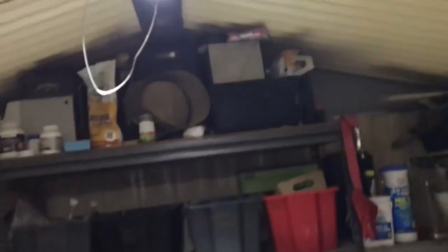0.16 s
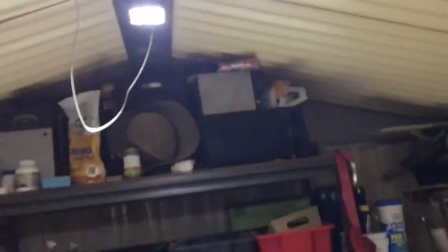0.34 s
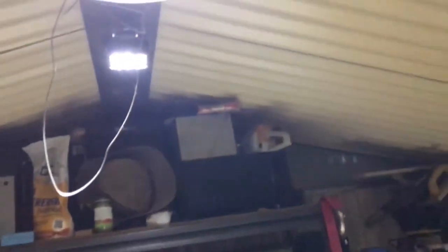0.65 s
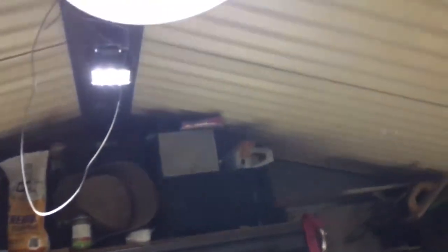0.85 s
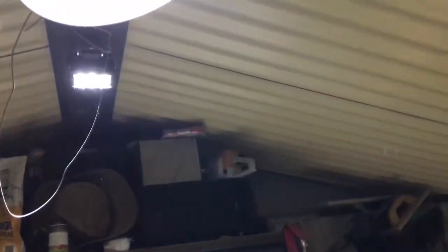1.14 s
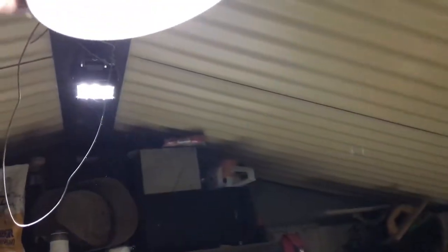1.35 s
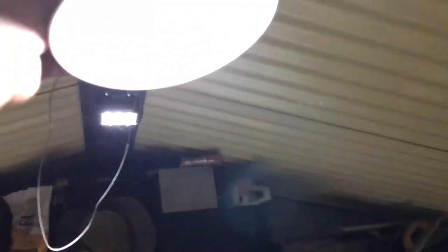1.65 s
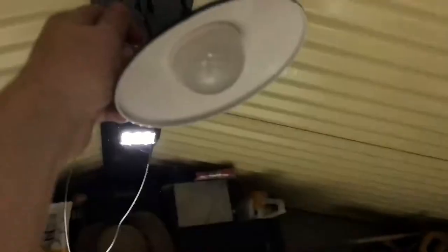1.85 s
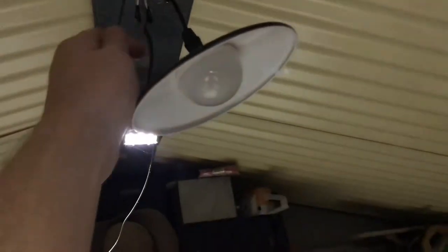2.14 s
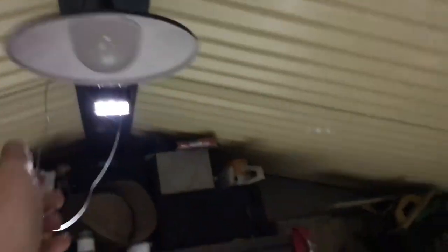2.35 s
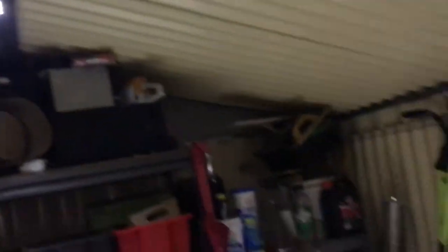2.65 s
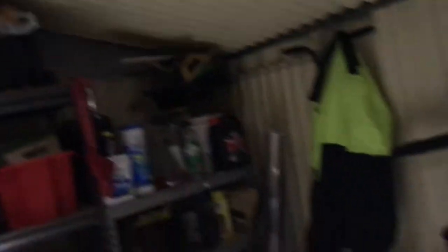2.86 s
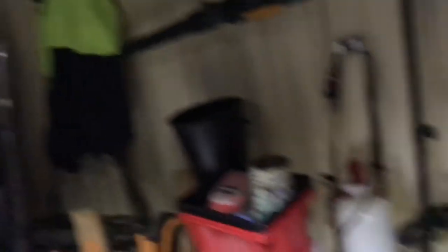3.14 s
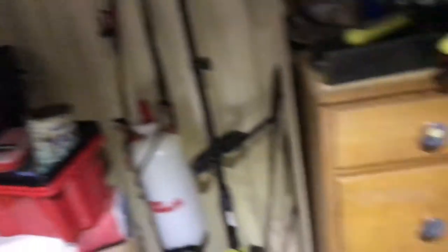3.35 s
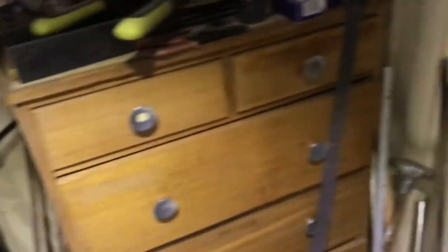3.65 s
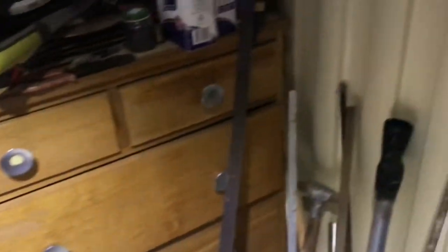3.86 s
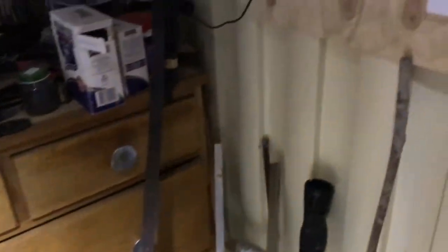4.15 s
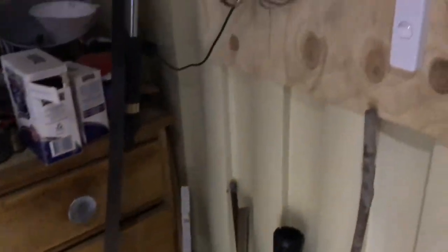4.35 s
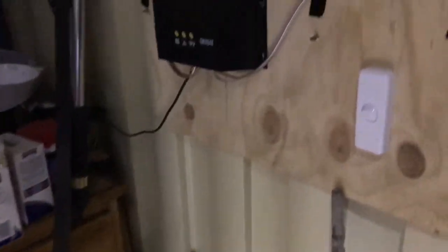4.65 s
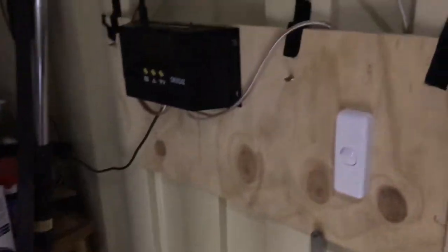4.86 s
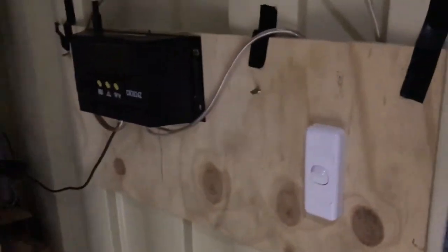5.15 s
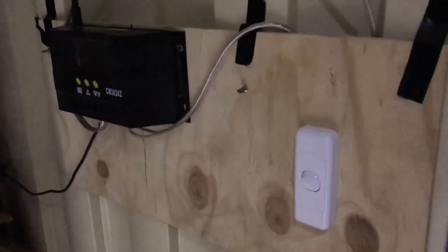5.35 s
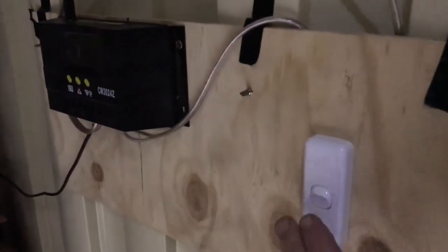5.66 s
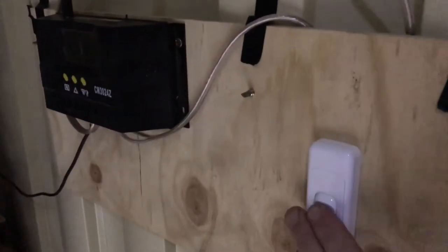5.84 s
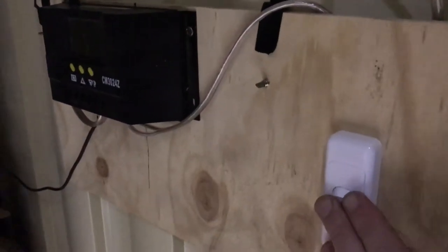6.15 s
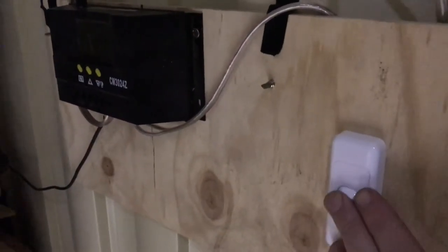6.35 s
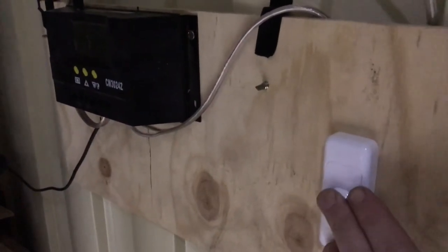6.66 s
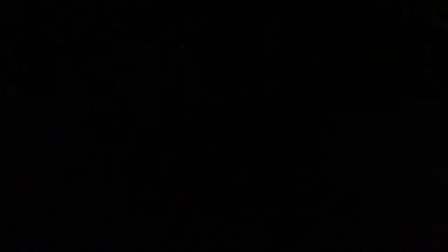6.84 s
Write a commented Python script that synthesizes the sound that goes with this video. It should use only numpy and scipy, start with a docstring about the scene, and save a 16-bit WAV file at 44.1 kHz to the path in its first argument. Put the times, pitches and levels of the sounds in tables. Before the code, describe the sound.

A quiet tin shed, heard from a handheld microphone, with faint low rumble and smooth hiss. Soft sleeve brushes come first, then small scuffs and a scrape around 0.8 s. Bright loose metal clinks at 0.96, 1.08 and 1.39 s, the last lingering faintly. Dull rubbing murmurs through the roof from 1.1 s, growing until 2.4. At 1.85 s a tiny, crisp click turns the lamp off; at 2.2 a short hard knock sets the roof sheets drumming softly. A clear metal clink rings at 2.8. From 3.3 to 5 s, shoes scuff, grit snaps, a soft heel thud lands near 3.5, with faint metal tinkles. A wavering hum near 90 Hz rises by 5 s, with faint shuffling after. Near stillness follows, then at 6.93 s a plastic rocker slams over: a loud, dry, very close double-edged snap with a brief woody knock.

```python
"""A plastic rocker switch on a plywood board snaps over, very close, after a walk through a tin shed.
Before it, loose metal clinks and scrapes, and a hanging lamp is clicked off and knocked, so the roof drums.
Shoes and sleeves scuff on the way to the wall, where a faint hum grows over still air.
Blows are damped modes plus coloured noise bursts; rubs are noise of jumping strength; a reverb adds the shed."""
import sys
import numpy as np
from scipy import signal
from scipy.fft import rfft, irfft
from scipy.io import wavfile
from scipy.ndimage import uniform_filter1d

SR = 44100
rng = np.random.default_rng(int(sys.argv[2]) if len(sys.argv) > 2 else 0)


def int16_out(signal):
    """Quantize to a 16-bit WAV file."""
    q = np.round(np.clip(np.atleast_2d(signal).T, -1, 1) * 32767)
    wavfile.write(sys.argv[1], SR, q.astype(np.int16))


N = 308700  # 7 s
TIME = np.arange(N) / SR
AGE = TIME[:SR]  # seconds since a blow

# Levels of single sounds are dry, before the shed's reverb.
# rocker creaks, tips over, slams home and rebounds: start_s [s], level_db [dB], cutoff_hz [Hz]
ROCKER_CONTACTS = [(6.9062, -65, 7000), (6.918, -62, 12000), (6.9284, -19, 15900), (6.9295, -16.5, 13200),
                   (6.9318, -24.5, 5000), (6.9353, -27.5, 6000)]
# modes of the switch plate: pitch_hz [Hz], level_db [dB], t60_s [s]
PLATE_MODES = [(1370, 7, 0.027), (1505, 6, 0.03), (1630, -1.5, 0.03), (1750, -4.5, 0.033), (2270, -6, .04),
               (2270, -8, 0.057), (2490, -14, 0.086), (3430, -11, 0.043), (3676, -6, 0.051),
               (3800, -1, 0.037), (4710, 1.5, 0.02), (5150, 1, 0.03), (5780, -10, 0.022), (6740, -4, 0.027),
               (9500, -10, .02)]
# modes of the plywood board and the wall behind: pitch_hz [Hz], level_db [dB], t60_s [s]
BOARD_MODES = [(113, -24, 0.36), (296, -24, 0.1), (403, -11, 0.032), (502, -5, 0.05), (618, 3.5, 0.052),
               (665, 2, 0.053)]
# colour of a plastic contact's crack: freq_hz [Hz], level_db [dB]
PLASTIC_COLOUR = [(100, -16), (220, -26), (450, -10), (680, 2.5), (930, -9), (1150, -17.5), (1450, 4.5),
                  (2900, -1.5), (4300, -4.5), (6800, -4.5), (8300, -8.5), (9700, -2.5), (12500, -7),
                  (16000, -3)]
# loose metal is struck: start_s [s], level_db [dB], cutoff_hz [Hz], favoured_hz [Hz], boost_db [dB],
# free_share [0-1, share of the swing that rings freely]
METAL_BLOWS = [(0.824, -45, 4900, 1820, 29, 0.5), (0.9633, -20.5, 9400, 1820, 6.5, 0),
               (1.0819, -22.5, 6300, 3750, 1.5, 0.06), (1.0871, -27, 2900, 1574, 17.5, 0),
               (1.294, -47, 2400, 1600, 8.5, 0.1), (1.3853, -27, 8900, 3940, 7, 0.08),
               (2.8013, -21.5, 3640, 3283, 17.5, 0.3), (3.515, -42, 4460, 3360, 22, 0.7),
               (4.219, -42.5, 4300, 1335, 11, .5), (4.837, -55, 2250, 1338, 11, 0.76)]
# metal slides on metal; the row at 1.399 s is the faint bright ring lingering after a clink:
# start_s [s], level_db [dB], length_s [s], cutoff_hz [Hz]
SLIDES_AND_LINGER = [(0.778, -57.5, 0.12, 1970), (1.236, -51.5, .15, 1980), (1.399, -64, 0.42, 8140),
                     (2.93, -62, 0.22, 1820), (3.48, -49, 0.16, 1960), (4.097, -65.5, 0.29, 1760)]
# modes of the loose metal: pitch_hz [Hz], level_db [dB], t60_s [s]
METAL_MODES = [(1059, -16.5, 0.23), (1326, -14.5, .42), (1483, -7, 0.11), (1480, -17.5, 0.096),
               (1587, -8, 0.29), (1809, -4, 0.21), (2020, -18.5, 0.85), (2280, -6.5, 0.045),
               (3217, -8.5, 0.21), (3370, -4.5, 0.13), (3476, -12.5, .24), (3660, 1.5, 0.082),
               (4011, -3, 0.35), (4290, -22, 0.4), (4700, -13.5, 0.154), (4950, 0.5, .19),
               (5600, -0.5, 0.2), (5605, -10, 0.084), (6236, -1.5, 0.46), (6540, -5, 0.28),
               (6650, -1.5, 0.15), (8180, -2, .13), (8660, -9, 0.099), (8900, -9.5, 0.19),
               (10820, -14, 0.1)]
# colour of a metal contact's crack: freq_hz [Hz], level_db [dB]
METAL_COLOUR = [(100, -36), (450, -18.5), (750, -15), (1050, -5), (1550, -3.5), (2600, -2.5), (5000, -0.5),
                (5800, -5), (6500, -0.5), (8500, -13.5), (12000, -3), (16000, -13.5)]
# small ticks and the lamp's click: start_s [s], level_db [dB], cutoff_hz [Hz]
LAMP_CONTACTS = [(1.781, -58, 3500), (1.8362, -47.5, 3460), (1.8507, -20.5, 19000)]
# colour of the lamp's click: freq_hz [Hz], level_db [dB]
CLICK_COLOUR = [(100, -24.5), (1200, -18.5), (2000, -15), (3400, -26), (5000, -11.5), (6000, -16),
                (7100, -12), (8200, -16), (10000, -5), (11000, 4), (12200, 0.5), (13500, -9.5),
                (16000, -17)]
# knocks on the lamp's fitting: start_s [s], level_db [dB], cutoff_hz [Hz]
FITTING_KNOCKS = [(2.197, -37, 2530), (2.2088, -21.5, 17000), (2.215, -30.5, 8000)]
# colour of those knocks: freq_hz [Hz], level_db [dB]
KNOCK_COLOUR = [(100, -35.5), (600, 0), (1400, -6.5), (1850, -26), (2300, -4), (3800, -6), (5000, -0.5),
                (6300, -4.5), (8800, -5), (10000, -14), (11000, -7.5), (16000, -15)]
# modes of the lamp's fitting: pitch_hz [Hz], level_db [dB], t60_s [s]
FITTING_MODES = [(1854, 13, 0.044), (1843, -20.5, .06), (2070, -8.5, 0.094), (2360, -15, 0.188),
                 (2650, -15, .18), (4670, 1, 0.035), (5100, -2, 0.0383), (5530, -12, .1)]
# jolts to the roof: start_s [s], modes_db [dB], wash_db [dB], cutoff_hz [Hz]
ROOF_JOLTS = [(1.618, -43.5, -46, 1580), (1.851, -40, -36, 900), (2.124, -39.5, -43, 590),
              (2.2094, -29, -32, 2500)]
# strong modes of the roof sheets: pitch_hz [Hz], level_db [dB], t60_s [s]
ROOF_MODES = [(71.6, -19, 0.438), (116.4, -5.5, 0.2), (207, -11.5, 1), (251.8, -8, 0.41), (311.6, 2.5, 0.3),
              (323, -8.5, .5), (374, 1, 0.29), (551, 1.5, 0.25), (653.3, 1, 0.25)]
# the sheets' many weaker modes as one wash: freq_hz [Hz], level_db [dB]
WASH_COLOUR = [(50, -9.5), (120, 3), (300, -6), (700, -4.5), (1300, -3.5), (2600, -5.5), (6000, -32)]
# a sole scuffs the floor: start_s [s], level_db [dB before the walking trim], length_s [s],
# tilt_db [dB per octave]
SOLE_SCUFFS = [(0.921, -42.5, 0.014, -0.5), (0.95, -37, 0.036, -1.5), (3.2844, -48.5, 0.027, 0.5),
               (3.334, -39.5, 0.022, 0.5), (3.499, -48.5, 0.22, -5), (3.552, -40.5, .07, 4.5),
               (4.05, -46, .024, 3), (4.52, -44.5, 0.026, -3), (4.946, -52, 0.011, -1.5)]
# a sleeve brushes past: start_s [s], level_db [dB before the walking trim], length_s [s],
# tilt_db [dB per octave]
SLEEVE_SWISHES = [(0.291, -52, 0.061, -1.5), (0.418, -55.5, 0.037, 0), (0.662, -52.5, 0.17, 3.5),
                  (1.013, -49, .03, 7), (1.21, -54, 0.22, 3.5), (1.6, -59.5, .16, 1.5),
                  (2.003, -60.5, 0.35, 2), (2.62, -45, 0.048, -1.5), (2.981, -48, 0.055, -0.5),
                  (4.861, -57, .08, 3), (5.819, -64.5, 0.28, -1)]
# grit snaps underfoot: start_s [s], level_db [dB before the walking trim]
GRIT_SNAPS = [(0.6894, -52), (3.287, -50), (3.353, -41), (4.5462, -39.5), (4.949, -53.5), (5.2794, -58),
              (5.497, -58), (5.83, -58.5), (6.378, -66)]
# a heel comes down: start_s [s], level_db [dB before the walking trim], decay_s [s, burst setting]
HEEL_THUDS = [(3.471, -42, 0.083), (3.501, -40.5, 0.068), (3.527, -41.5, 0.12)]
# colour of scuffs, swishes and grit: freq_hz [Hz], level_db [dB]
RUB_COLOUR = [(100, -22.5), (400, -16.5), (750, -14.5), (1150, -1.5), (1700, -0.5), (2500, -0.5),
              (3700, -0.5), (5500, -6), (8000, -8.5), (10300, -10), (12000, -10), (16000, -17)]
# colour of the heel's thud: freq_hz [Hz], level_db [dB]
THUD_COLOUR = [(40, -33), (110, -7), (190, 1), (300, 4.5), (450, -8), (650, -2.5), (1000, -18), (1600, -11),
               (3000, -32), (10000, -31)]
# colour of the still air: freq_hz [Hz], level_db [dB, relative]
AIR_COLOUR = [(18, -30), (30, -0.5), (55, -0.5), (189, -7), (415, -13), (499, -18), (632, -18.5),
              (2120, -25.5), (4300, -27.5), (4780, -28), (10500, -34.5), (14800, -32.5), (16000, -41)]
# the shed's reverberation: freq_hz [Hz], t60_s [s]
SHED_DECAY = [(100, 0.94), (300, 0.52), (700, 0.33), (1800, 0.23), (5000, 0.26), (12000, 0.1)]

# the more a blow favours one mode, the less it cracks
CLINK_CRACK_DB, CRACK_LOSS_PER_BOOST_DB = 1.5, 0.49
TOUCH_T60_S = 0.0896  # decay of the choked share of a clink
# a hand takes hold of the lamp, rubs ever harder and lets go
GRIP_S, LET_GO_S = 1.14, 2.42
RUB_DB, RUB_GROWTH_DB_PER_S, RUB_ONSET_DB_PER_S, RUB_RELEASE_DB_PER_S = -60.5, 7.5, 90, 73
# a sole bites at once, and a longer slide takes longer to stop
SOLE_RISE_S, SOLE_T60_S, SOLE_T60_PER_LENGTH, SOLE_T60_MAX_S = 0.002, 0.031, 8.1, 0.66
# cloth swells and dies away softly
CLOTH_RISE_S, CLOTH_T60_S = 0.044, 0.25
# faint shuffling at the wall; its level and the other walking levels share one trim
SHUFFLE_FROM_S, SHUFFLE_TO_S, SHUFFLE_LENGTH_S = 5.25, 5.45, 0.042
SHUFFLE_UNTRIMMED_DB, SHUFFLE_TILT_DB_PER_OCTAVE, WALKING_TRIM_DB = -64.5, -2, -2.0
# the hum and whirr grow during the approach to the wall
APPROACH_FROM_S, APPROACH_TO_S, HUM_FAR_DB, HUM_NEAR_DB = 3.7, 5.0, -76.5, -62.5
AIR_DB = -63.5  # rms above 200 Hz, around which it wanders


def wall_switch(plate_db=-18, board_db=-29.5, slam_s=6.9288):
    """The spring throws the rocker over; each contact cracks, and the slam rings the plate and its board."""
    out = np.zeros(N)
    for start_s, level_db, cutoff_hz in ROCKER_CONTACTS:
        snap = soften(crack(PLASTIC_COLOUR, decay_s=0.0109), cutoff_hz)
        add(out, start_s, blow(snap, level_db))
    slam = amp(plate_db) * ring(PLATE_MODES) + amp(board_db) * ring(BOARD_MODES)
    add(out, slam_s, slam)
    return shed(out, wet_db=-8.0, gap_s=0.0035)


def clinks():
    """Loose metal is struck and slides; the place of each blow favours some of its modes."""
    return shed(metal_blows() + slides_and_linger(), wet_db=-8)


def metal_blows(accent_octaves=0.071, crack_decay_s=0.054, scatter_db=2.5):
    """Each blow rings the metal and cracks; touching pieces choke part of the ring."""
    out = np.zeros(N)
    pitch_hz, mode_db, t60_s = np.transpose(METAL_MODES)
    for start_s, level_db, cutoff_hz, favoured_hz, boost_db, free_share in METAL_BLOWS:
        distance = np.log2(pitch_hz / favoured_hz) / accent_octaves
        place_db = boost_db * np.exp(-distance ** 2)
        place_db = place_db + scatter_db * rng.standard_normal(len(pitch_hz))
        damping = free_share + (1 - free_share) * fade(TOUCH_T60_S)
        ringing = 2.0 * ring(np.c_[pitch_hz, mode_db + place_db, t60_s]) * damping
        crack_db = CLINK_CRACK_DB - CRACK_LOSS_PER_BOOST_DB * boost_db
        hit = ringing + amp(crack_db) * crack(METAL_COLOUR, crack_decay_s)
        # some of the unsoftened hit stays for brightness
        hit = soften(hit, cutoff_hz) + amp(-8.5) * hit
        add(out, start_s, blow(hit, level_db))
    return out


def slides_and_linger(judder_db=5):
    """Uneven noise drives briefly ringing metal: friction of pressed pieces, and one clink's lingering ring."""
    out = np.zeros(N)
    short_ring = ring(METAL_MODES) * fade(0.027)
    for start_s, level_db, length_s, cutoff_hz in SLIDES_AND_LINGER:
        swell = np.sin(np.pi * np.minimum(AGE / length_s, 1))
        drive = slips(judder_db, size=150) * swell
        sound = soften(signal.fftconvolve(drive, short_ring)[:SR], cutoff_hz)
        add(out, start_s, amp(level_db) * sound / np.std(sound[AGE < length_s]))
    return out


def lamp():
    """A small, bright click puts the lamp out; its fitting is knocked shortly before the hand lets go."""
    click, knock = np.zeros(N), np.zeros(N)
    for start_s, level_db, cutoff_hz in LAMP_CONTACTS:
        tick = soften(crack(CLICK_COLOUR, decay_s=0.006), cutoff_hz)
        add(click, start_s, blow(tick, level_db))
    for start_s, level_db, cutoff_hz in FITTING_KNOCKS:
        hit = crack(KNOCK_COLOUR, decay_s=0.018) + ring(FITTING_MODES)
        add(knock, start_s, blow(soften(hit, cutoff_hz), level_db))
    return shed(click, wet_db=-2.5) + shed(knock, wet_db=-5.5, gap_s=0.0055)


def roof():
    """The lamp's beam passes jolts and rubbing on to the roof sheets, which swell and drum."""
    out = np.zeros(N)
    swell = 1 - fade(0.07)
    for start_s, modes_db, wash_db, cutoff_hz in ROOF_JOLTS:
        drumming = soften(ring(ROOF_MODES), cutoff_hz) * swell
        wash = soften(crack(WASH_COLOUR, decay_s=0.83), cutoff_hz) * swell
        add(out, start_s, blow(drumming, modes_db))
        add(out, start_s, blow(wash, wash_db))
    return shed(out, wet_db=-6.5) + roof_rub()


def roof_rub():
    """Rubbing at the lamp murmurs through three roof resonances, louder until the hand lets go."""
    rub = rng.standard_normal(N)
    murmur = np.zeros(N)
    for pitch_hz, level_db in [(314, 2), (377, -5.5), (560, -10.0)]:
        narrow = resonate(rub, pitch_hz, 27)
        murmur += amp(level_db) * resonate(narrow, pitch_hz, 110)
    held_db = RUB_DB + RUB_GROWTH_DB_PER_S * (np.clip(TIME, GRIP_S, LET_GO_S) - GRIP_S)
    before_db = RUB_ONSET_DB_PER_S * np.maximum(GRIP_S - TIME, 0)
    after_db = RUB_RELEASE_DB_PER_S * np.maximum(TIME - LET_GO_S, 0)
    return unit(murmur) * amp(held_db - before_db - after_db)


def walking(uneven_db=1.5, shuffle_scatter_db=6.5):
    """Soles and cloth rub in showers of tiny slips; grit snaps, a heel thuds, the feet settle at the wall."""
    out = np.zeros(N)
    for start_s, level_db, length_s, tilt_db in SOLE_SCUFFS:
        add(out, start_s, scuff(level_db, length_s, tilt_db))
    for start_s, level_db, length_s, tilt_db in SLEEVE_SWISHES:
        add(out, start_s, stroke(level_db, length_s, tilt_db, CLOTH_RISE_S, CLOTH_T60_S))
    out *= amp(uneven_db * wander(90))
    for start_s, level_db in GRIT_SNAPS:
        add(out, start_s, amp(level_db) * crack(RUB_COLOUR, decay_s=0.0126))
    for start_s, level_db, decay_s in HEEL_THUDS:
        add(out, start_s, amp(level_db) * crack(THUD_COLOUR, decay_s))
    for start_s in spread(SHUFFLE_FROM_S, SHUFFLE_TO_S, count=3):
        level_db = SHUFFLE_UNTRIMMED_DB + shuffle_scatter_db * rng.standard_normal()
        add(out, start_s, scuff(level_db, SHUFFLE_LENGTH_S, SHUFFLE_TILT_DB_PER_OCTAVE))
    return amp(WALKING_TRIM_DB) * shed(out, wet_db=-6)


def scuff(level_db, length_s, tilt_db):
    """A sole bites at once; a longer slide takes longer to stop."""
    t60_s = min(SOLE_T60_S + SOLE_T60_PER_LENGTH * length_s, SOLE_T60_MAX_S)
    return stroke(level_db, length_s, tilt_db, SOLE_RISE_S, t60_s)


def stroke(level_db, length_s, tilt_db, rise_s, t60_s, grain_db=3.0):
    """One rub: the pressure rises, holds and fades over a shower of tiny slips."""
    rise = np.minimum(AGE / rise_s, 1)
    release = np.exp(-np.log(1000) * np.maximum(AGE - length_s, 0) / t60_s)
    grains = unit(colour(slips(grain_db, size=45), RUB_COLOUR, tilt_db))
    return amp(level_db) * rise * release * grains


def background():
    """Quiet outdoor rumble and smooth hiss lie under a low, wavering hum with a soft whirr."""
    return still_air() + wall_hum()


def still_air():
    """Coloured noise, rumble and hiss together, drifts slightly in level."""
    air = colour(rng.standard_normal(N), AIR_COLOUR)
    highpass = signal.butter(4, 200, "high", fs=SR, output="sos")
    above_rumble = signal.sosfilt(highpass, air)
    return air / np.std(above_rumble) * amp(AIR_DB + 0.5 * wander(0.76))


def wall_hum():
    """A tone near 90 Hz and its lower octave waver in pitch and level, beside a band of noise."""
    phase = 2 * np.pi * np.cumsum(89.7 + 3.1 * wander(6.7)) / SR
    tones = np.sin(phase) + amp(-7.0) * np.sin(phase / 2)
    hum = np.sqrt(2) * tones * amp(3.8 * wander(4.1))
    whirr = amp(-8.5) * unit(soften(resonate(rng.standard_normal(N), 170, 130), 350))
    approach_db = np.interp(TIME, [APPROACH_FROM_S, APPROACH_TO_S], [HUM_FAR_DB, HUM_NEAR_DB])
    return (hum + whirr) * amp(approach_db)


def shed(x, wet_db, gap_s=0.0013):
    """Direct sound plus dense reflections from tin walls and clutter; each band fades at its own rate."""
    freq_hz = np.fft.rfftfreq(SR, 1 / SR)
    noise, tail = rfft(rng.standard_normal(SR)), 0
    centres_hz = np.geomspace(100, 12800, 8)
    for centre_hz, share in zip(centres_hz, np.eye(len(centres_hz))):
        band = irfft(noise * along(np.c_[centres_hz, share], freq_hz))
        tail = tail + band * fade(along(SHED_DECAY, centre_hz))
    # the reflections build up after a short gap
    tail = tail * (1 - np.exp(-(AGE / gap_s) ** 2))
    return x + amp(wet_db) * signal.fftconvolve(x, tail / np.linalg.norm(tail))[:N]


def ring(modes):
    """Damped modes after one blow; successive modes swing in opposite senses."""
    total = np.zeros(SR)
    for k, (pitch_hz, level_db, t60_s) in enumerate(modes):
        swing = np.sin(2 * np.pi * pitch_hz * AGE)
        total += (-1) ** k * amp(level_db) * fade(t60_s) * swing
    return blow(total, 0)


def crack(points, decay_s, count=6):
    """Many close, fast-dying modes of like strength: a coloured burst."""
    burst = rng.standard_normal(SR) * fade(decay_s)
    for _ in range(count):
        # even out the spectrum, keep the phase, then damp the spill
        flat = irfft(np.exp(1j * np.angle(rfft(burst))))
        burst = flat * fade(6 * decay_s)
    return blow(colour(burst, points), 0)


def slips(spread_db, size):
    """Friction: noise whose strength jumps at random every size samples."""
    strength_db = spread_db * np.repeat(rng.standard_normal(SR // size), size)
    return rng.standard_normal(SR) * amp(strength_db)


def soften(x, cutoff_hz):
    """A longer contact pushes less treble."""
    lowpass = signal.butter(2, min(cutoff_hz, 0.45 * SR), fs=SR, output="sos")
    return signal.sosfilt(lowpass, x)


def resonate(x, pitch_hz, width_hz):
    """One band-pass resonance."""
    return signal.lfilter(*signal.iirpeak(pitch_hz, pitch_hz / width_hz, fs=SR), x)


def colour(x, points, tilt_db=0):
    """Causal filter through (Hz, dB) points, tilted per octave about 3 kHz, with no more tilt below 500 Hz."""
    freq_hz = np.fft.rfftfreq(len(x), 1 / SR)
    level_db = along(points, freq_hz) + tilt_db * np.log2(np.maximum(freq_hz, 500) / 3000)
    # folding the cepstrum forward gives minimum phase
    cepstrum = irfft(np.log(amp(level_db)))
    cepstrum[1:] *= 2
    response = np.exp(rfft(cepstrum[:len(x) // 2], len(x)))
    return irfft(rfft(x) * response)


def along(points, freq_hz):
    """Read (Hz, value) points on a log-frequency axis."""
    point_hz, value = np.transpose(points)
    return np.interp(np.log(freq_hz + 1), np.log(point_hz), value)


def wander(rate_hz):
    """Slow random wander with a spread near 1."""
    step = int(SR / rate_hz)
    held = np.repeat(rng.standard_normal(N // step + 1), step)
    return unit(uniform_filter1d(held, step)[:N])


def spread(start_s, end_s, count):
    """Random moments, one in each equal part of a span."""
    return start_s + (end_s - start_s) * (np.arange(count) + rng.random(count)) / count


def amp(level_db):
    """Decibels to gain."""
    return 10 ** (np.asarray(level_db) / 20)


def fade(t60_s):
    """Exponential decay, 60 dB down after t60_s."""
    return np.exp(-np.log(1000) * AGE / max(t60_s, 1e-4))


def blow(x, level_db):
    """Scale a transient to the energy of 10 ms at this level."""
    return x * amp(level_db) / np.sqrt(np.sum(x ** 2) / (SR / 100))


def unit(x):
    """Scale to a standard deviation of 1."""
    return x / np.std(x)


def add(track, start_s, x):
    """Mix a sound into the track at start_s."""
    i = int(start_s * SR)
    track[i:i + len(x)] += x[:N - i]


def scene():
    """Everything in the shed, at one microphone."""
    return (wall_switch() + clinks() + lamp() + roof() + walking() + background())[None]


def record(dry):
    """Thins the deepest bass, clips at full scale, then a steep low-pass removes the top above 16.1 kHz."""
    highpass = signal.butter(6, 36, "high", fs=SR, output="sos")
    clipped = np.clip(signal.sosfilt(highpass, dry), -1, 1)
    lowpass = signal.ellip(10, 0.2, 80, 16100, fs=SR, output="sos")
    return signal.sosfilt(lowpass, clipped)


dry = scene()
out = record(dry)
int16_out(out)
```